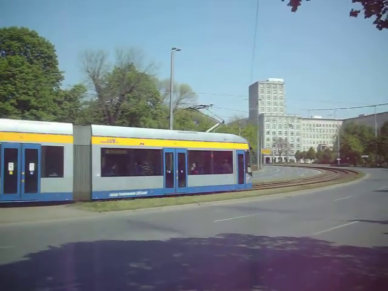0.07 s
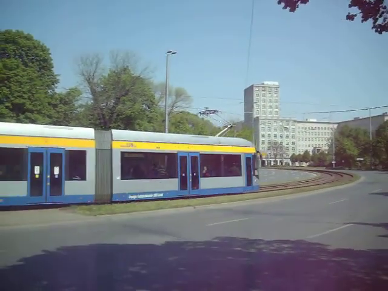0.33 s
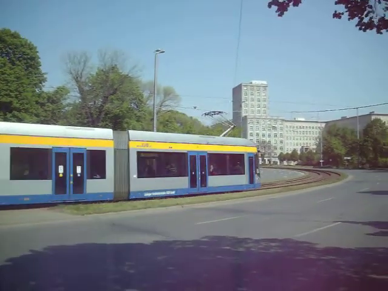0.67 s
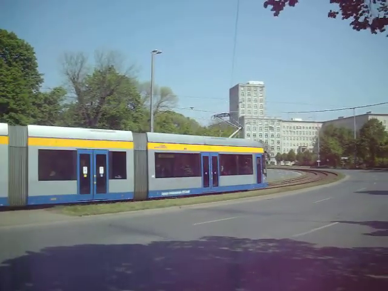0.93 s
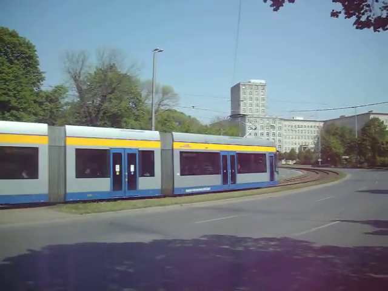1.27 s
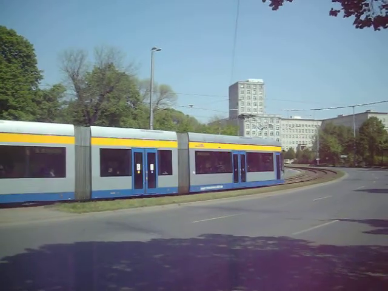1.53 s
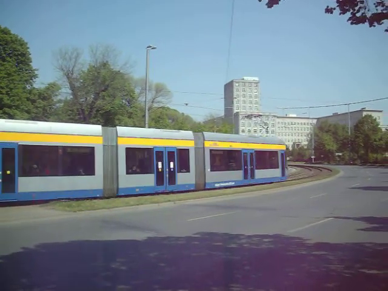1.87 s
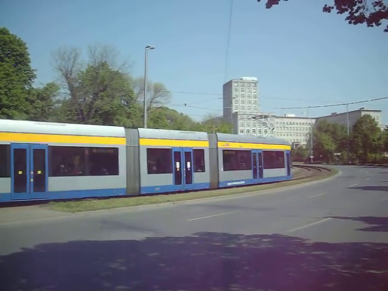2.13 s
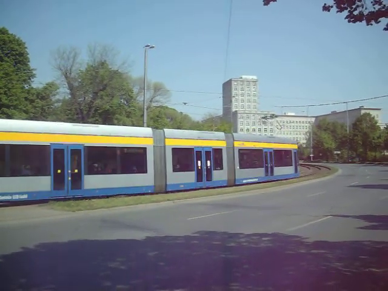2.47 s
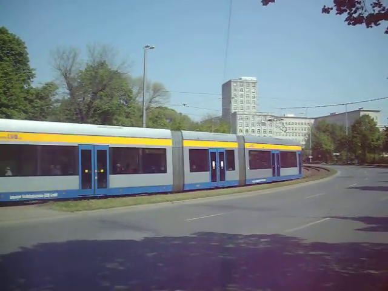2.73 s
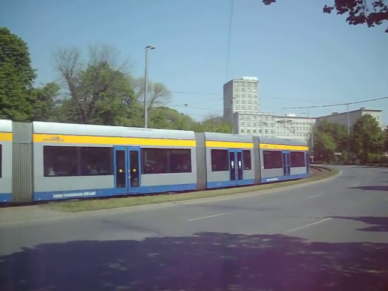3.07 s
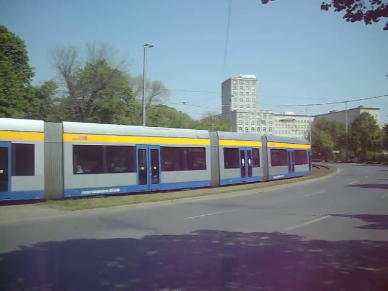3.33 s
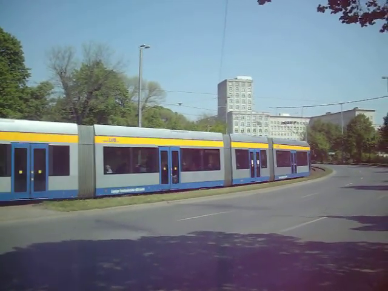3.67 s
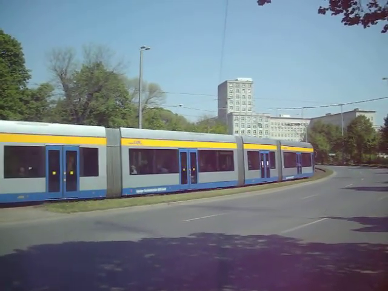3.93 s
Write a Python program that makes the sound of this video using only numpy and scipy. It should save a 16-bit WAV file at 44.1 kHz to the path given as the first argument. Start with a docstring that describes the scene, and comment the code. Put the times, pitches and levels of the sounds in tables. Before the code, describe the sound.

A tram rolls past on a curve beside a road, rumbling and thudding while its wheels clank over joints and briefly squeak. A faint drive whine, traffic hiss and distant bird chirps sit underneath, caught by a small microphone.

```python
"""A tram rolls past on a curve beside a road: its body rumbles and thuds over uneven track, the wheels
roar on the rails and the drive whines faintly. Wheels clank and ring over joints, and their flanges
grind and squeak as they stick and slip. A small bird chirps far off over the traffic hiss.
Clanks, squeaks and chirps echo in the street. The small camera's limiter ducks the rumble after the
loudest squeaks, and one thin, bright tick cuts through."""
import sys
import numpy as np
from scipy import signal
from scipy.fft import rfft, irfft
from scipy.io import wavfile
from scipy.ndimage import uniform_filter1d

SR = 44100
rng = np.random.default_rng(int(sys.argv[2]) if len(sys.argv) > 2 else 0)


def inscribe(sig):
    """Save sig as 16-bit PCM at rate SR to the path in sys.argv[1].

    A 1-D sig is mono; a 2-D sig holds one channel per row.
    Samples are clipped to [-1, 1] before scaling.
    """
    pcm = np.round(np.clip(np.atleast_2d(sig).T, -1, 1) * 32767)
    wavfile.write(sys.argv[1], SR, pcm.astype(np.int16))


N = 176400  # 4 seconds


def amp(db):
    """Decibels to gain."""
    return 10 ** (np.asarray(db) / 20)


def unit(x):
    """Scales to rms 1."""
    return x / np.sqrt(np.mean(x ** 2) + 1e-20)


def add(mix, start_s, sound):
    """Lays a sound into the mix, trimmed at the end."""
    part = mix[max(round(start_s * SR), 0):][:len(sound)]
    part += sound[:len(part)]


def seconds(length):
    """Time axis of that length."""
    return np.arange(int(length * SR)) / SR


def fader(points):
    """Gain over time from (seconds, dB) points."""
    return amp(np.interp(np.arange(N) / SR, *np.transpose(points)))


def wander(rate_hz):
    """Smooth random motion, rms 1."""
    hz = np.fft.rfftfreq(N, 1 / SR)
    return unit(irfft(rfft(rng.standard_normal(N)) * np.exp(-(hz / rate_hz) ** 2), N))


def noise(spectrum, patch_db=0):
    """Noise coloured by (Hz, dB) points, with brief random patches in time and pitch, rms 1."""
    grid = signal.stft(rng.standard_normal(N), nperseg=512, noverlap=384)[2]
    patches = uniform_filter1d(rng.standard_normal(grid.shape), size=12, axis=0)
    patches = unit(uniform_filter1d(patches, size=14, axis=1))
    mottled = signal.istft(grid * amp(patch_db * patches), nperseg=512, noverlap=384)[1][:N]
    hz, db = np.transpose(spectrum)
    colour = amp(np.interp(np.log(np.fft.rfftfreq(N, 1 / SR) + 1), np.log(hz), db))
    return unit(irfft(rfft(mottled) * colour, N))


def burst(t, length, attack_s, fade_s):
    """Attack, hold, exponential release."""
    return np.minimum(t / attack_s, 1) * np.exp(-np.maximum(t - length, 0) / fade_s)


def low_pass(x, hz):
    """Steep cut above hz."""
    return signal.oaconvolve(x, signal.firwin(255, hz, window=("kaiser", 8), fs=SR), "same")


def rolling_bed():
    """The body rumbles, the wheels roar on the rails, and rails and traffic hiss."""
    # The colour of each layer. Each row: frequency in Hz, relative level in dB.
    rumble_colour = [(8, -24), (25, -12.5), (53, -4), (67, -3.5), (90, 0.5), (117, -5), (140, -1),
                     (168, -1.5), (205, -5.5), (300, -10), (400, -11), (480, -29), (900, -57)]
    roar_colour = [(100, -12.5), (270, 2.5), (420, 0), (560, 2), (690, 0.5), (830, 1.5), (950, 1.5),
                   (1100, -3.5), (1250, -9.5), (1450, -15.5), (1800, -23), (2050, -16), (2230, -12.5),
                   (2400, -19.5), (2650, -26), (3500, -32), (6000, -55)]
    hiss_colour = [(300, -7.5), (2400, -0.5), (2850, 2.5), (3350, -1), (3600, -2.5), (4300, -6), (4950, 0),
                   (5300, -8.5), (5800, -22), (8000, -17)]
    # The fader ride of each layer. Each row: time in seconds, level in dB.
    rumble_ride = [(0, -12.5), (.7, -13), (.92, -11.5), (1.15, -12), (1.35, -13.5), (1.85, -11.5),
                   (2.2, -12.5), (2.4, -13.5), (3.0, -12), (3.13, -15), (3.3, -11.5), (4, -13)]
    roar_ride = [(0, -16.5), (.15, -21.5), (.5, -18.5), (.8, -19.5), (1.1, -17.5), (1.3, -18), (1.75, -17),
                 (2.0, -18.5), (2.2, -18.5), (2.45, -17), (2.8, -21), (3.05, -18.5), (3.3, -19.5),
                 (3.45, -17), (3.7, -13.5), (4, -17)]
    hiss_ride = [(0, -40), (.2, -45.5), (.6, -39.5), (.8, -38.5), (1.7, -40.5), (2.2, -37.5), (2.5, -41.5),
                 (3.05, -39.5), (3.4, -38.5), (3.8, -34.5), (4, -35.5)]
    rumble = noise(rumble_colour, patch_db=0.47) * fader(rumble_ride)
    roar = noise(roar_colour, patch_db=1.8) * fader(roar_ride)
    hiss = noise(hiss_colour, patch_db=1.5) * fader(hiss_ride)
    return rumble + roar + hiss


def bogie_thuds():
    """Uneven track sets the body booming for a few cycles."""
    # Jolts of the bogies. Each row: start in seconds, pitch in Hz, level in dB.
    jolts = [(0, 288.6, -11.5), (.14, 86.6, -16.5), (.48, 70, -14), (0.739, 92.8, -6), (0.886, 84.3, -6),
             (1.294, 160.4, -3), (1.489, 147.5, -10), (1.731, 69.2, -12.5), (1.89, 170, -10),
             (2.281, 169.7, -6), (2.432, 139.4, -6.5), (2.541, 125.6, -5), (2.729, 158, -12.5),
             (2.86, 100, -4.5), (2.974, 88.7, -1), (3.32, 160.7, -10), (3.488, 96.3, -12.5),
             (3.951, 91, -9)]
    out, t = np.zeros(N), seconds(.5)
    rise_s = 0.025
    swell = (t / rise_s * np.exp(1 - t / rise_s)) ** 2
    for (start, hz, db), phase in zip(jolts, rng.random(len(jolts))):
        add(out, start, amp(db) * swell * np.sin(2 * np.pi * (hz * t + phase)))
    return out


def wheel_ring(t, tilt_db):
    """A struck wheel rings in its modes, tuned and balanced a little differently each time."""
    # The wheel's modes. Each row: pitch in Hz, relative level in dB, seconds to fall by 60 dB.
    wheel_modes = [(624, -5.5, 0.014), (974, -0.5, 0.048), (1121, 0, 0.056), (1219, -0.5, 0.046),
                   (1594, -12, 0.013), (1880, -12, 0.005), (2099, -6, 0.022), (2370, -6, 0.016),
                   (2753, -8, 0.012), (2942, -6, 0.037), (3160, -7, 0.03), (3287, -9.5, 0.033),
                   (3354, -5, 0.03), (5300, -24.5, 0.032)]
    hz, mode_db, t60 = np.transpose(wheel_modes)[:, :, None]
    pivot_hz, spread_db = 2310, 1.56
    detune, spread = rng.standard_normal((2, len(wheel_modes), 1))
    modes = amp(-60 * t / t60) * np.sin(2 * np.pi * hz * (1 + 0.0052 * detune) * t)
    weight = amp(mode_db + tilt_db * np.log2(hz / pivot_hz) + spread_db * spread)
    polarity = rng.choice([-1, 1], hz.shape)
    return (weight * polarity * modes / np.linalg.norm(modes, axis=1, keepdims=True)).sum(0)


def wheel_clanks():
    """At a joint, a blow and a short gritty scrape ring the wheel and spit some treble."""
    # Wheel hits. Each row: start in seconds, scrape length in seconds, relative level in dB,
    # treble trim in dB, tilt of the ring in dB per octave.
    hits = [(0.032, 0.011, -21.5, 8.5, 0), (0.049, 0.047, -38, 0.5, 0), (0.239, 0.013, -21, -6, -3),
            (0.255, 0.016, -16.5, -4.5, -5), (0.432, 0.013, -29, 5, 0), (0.527, 0.027, -26, -2, -7),
            (0.597, 0.023, -22.5, 0.5, -5.5), (0.636, 0.032, -27, 0.5, -6.5),
            (0.672, 0.0064, -24.5, 1, -1.5), (0.937, 0.011, -25, -1, -10), (0.969, 0.01, -18, -2, 10.5),
            (1.22, 0.06, -28.5, 10.5, -5), (1.389, .01, -14.5, 3, 3), (1.422, .008, -17.5, -11, -4),
            (1.584, 0.0083, -26, 5, -4), (1.745, 0.0099, -19, -2, 4), (1.757, .02, -25, -4, -2.5),
            (1.788, 0.0072, -16, -8, -5), (1.81, 0.0094, -26.5, -2, -2.5), (2.042, 0.0045, -22, 6, -7),
            (2.076, .007, -22.5, 16.5, -7.5), (2.094, 0.016, -13, -5.5, -2.5),
            (2.449, 0.052, -24.5, 7, 1.5), (2.495, 0.014, -18.5, 1, -3.5), (2.581, .03, -21, 6, -5),
            (2.698, .008, -28.5, -5.5, -7.5), (2.821, 0.0089, -37, -9.5, 7), (3.284, 0.029, -22, 1, 2),
            (3.323, .006, -24, 5, -6), (3.477, 0.021, -22.5, -5, -4), (3.503, 0.028, -21.5, -1, -4.5),
            (3.646, 0.015, -16, 0, -0.5), (3.717, 0.038, -27, -3, -8.5), (3.783, 0.014, -21, -6, 0),
            (3.807, 0.015, -18, -5, -1), (3.848, 0.023, -19, 3.5, -1)]
    # The sizzle of the contact. Each row: frequency in Hz, relative level in dB.
    treble_colour = [(1000, -28), (3000, -9), (3600, -3), (4200, -13), (5200, 1.5), (5800, -7), (9000, -4)]
    strike_db, ring_db, treble_db = 19, -6.5, -16
    out, t = np.zeros(N), seconds(.2)
    grit = unit(np.exp(0.47 * wander(rate_hz=310)))
    treble = noise(treble_colour)
    for start, length, db, trim_db, tilt_db in hits:
        here = (round(start * SR) + np.arange(len(t))) % N
        contact = burst(t, length, attack_s=0.0014, fade_s=.005) * grit[here]
        force = contact * rng.standard_normal(len(t))
        force[0] += amp(strike_db)  # the blow ahead of the scrape
        add(out, start, amp(db + ring_db) * signal.fftconvolve(force, wheel_ring(t, tilt_db)))
        add(out, start, amp(db + treble_db + trim_db) * contact * treble[here])
    return out


def street_echo(x):
    """A thin tail of scattered echoes from road, trees and the tram's side."""
    t, t60_s = seconds(.5), 0.31
    tail = rng.standard_normal(len(t)) * amp(-60 * t / t60_s) * np.minimum(t / .01, 1)
    return signal.oaconvolve(x, tail / np.linalg.norm(tail))[:N]


def drive_whines():
    """The drive and singing wheels give thin wavering tones that swell and fade, most creeping upward."""
    # Whines. Each row: start and length in seconds, first and last pitch in Hz, relative level in dB.
    glides = [(.05, .72, 935, 950, -23), (.7, 1.35, 955, 1045, -29), (.45, .55, 400, 412, -25),
              (2.2, 1.0, 878, 897, -25), (2.95, 1.4, 890, 920, -25.5), (.45, .6, 2020, 2070, -40),
              (3.55, .5, 2090, 2150, -39), (.95, .6, 1510, 1560, -38), (1.45, .6, 1535, 1560, -42),
              (.55, .5, 2160, 2195, -41), (1.0, .45, 2200, 2255, -35), (1.4, 1.25, 2230, 2245, -43),
              (2.73, .24, 2230, 2240, -31), (2.85, .6, 2242, 2240, -38)]
    out = np.zeros(N)
    shake = wander(rate_hz=16)
    for start, length, from_hz, to_hz, db in glides:
        t = seconds(length)
        waver = 1 + .0015 * wander(rate_hz=30)[:len(t)]
        hz = np.interp(t, [0, length], [from_hz, to_hz]) * waver
        tremble = 1 + .25 * np.roll(shake, -round(start * SR))[:len(t)]
        swell = np.sin(np.pi * t / length) * tremble
        add(out, start, amp(db + 1.5) * swell * np.sin(2 * np.pi * np.cumsum(hz) / SR))
    return out


def flange_squeaks():
    """The flange sticks and slips on the rail in short, unsteady tones, once with a bright snap."""
    # Squeaks. Each row: start and length in seconds, level in dB, first and last pitch in Hz,
    # second and third harmonic in dB against the fundamental.
    slips = [(.25, 0.036, -17.5, 1200, 1205, -12, -24), (0.962, 0.011, -0.5, 1041, 1081, -26, -26),
             (0.969, 0.012, -6, 1155, 1150, -3.5, -14.5), (0.988, .026, -4, 1158, 1178, -18, -26.5),
             (1.955, 0.045, -17.5, 1130, 1102, -29, -26), (2.028, 0.022, -1, 1072, 1020, -28, -31),
             (2.066, 0.012, -9, 1105, 1052, -18.5, -24), (2.092, 0.017, -5.5, 1073, 1065, -8.5, -7.5),
             (2.111, .022, -15.5, 1078, 1115, -6.5, -5), (2.589, 0.017, -11.5, 1252, 1153, -13, -27.5),
             (2.607, 0.017, -21, 1077, 1090, -1, -2), (2.622, 0.032, -13.5, 1186, 1090, -15.5, -23)]
    # The snap as the flange slips free. Each row: frequency in Hz, relative level in dB.
    snap_colour = [(3000, -44), (4500, -13), (4900, -23), (5350, 5.5), (5550, -3), (5700, -2.5),
                   (6200, -21), (7500, -7.5), (12000, -5)]
    snap_at_s, snap_db = 2.092, -2.5
    out, t = np.zeros(N), seconds(.1)
    jitter, shake = wander(rate_hz=390), wander(rate_hz=270)
    for start, length, db, from_hz, to_hz, second_db, third_db in slips:
        here = round(start * SR) + np.arange(len(t))
        hz = np.interp(t, [0, length], [from_hz, to_hz]) * (1 + 0.018 * jitter[here])
        phase = 2 * np.pi * np.cumsum(hz) / SR
        harmonics_db = [0, second_db, third_db, third_db - 19, third_db - 19]
        tone = sum(amp(h) * np.sin(k * phase) for k, h in enumerate(harmonics_db, 1))
        envelope = burst(t, length, attack_s=0.0033, fade_s=.003) * np.exp(0.13 * shake[here])
        add(out, start, amp(db) * tone * envelope)
    snap = noise(snap_colour)[:len(t)] * burst(t, 0.0032, attack_s=.002, fade_s=0.0041)
    add(out, snap_at_s, amp(snap_db) * snap)
    return out


def distant_bird():
    """Each chirp is one small, unsteady arch of pitch, half lost in its echoes."""
    # Chirps. Each row: start and length in seconds, top of the arch in Hz, relative level in dB.
    chirps = [(0.326, 0.03, 4530, -38), (0.355, 0.037, 4100, -33), (0.388, 0.029, 3630, -36),
              (.912, 0.018, 4240, -32.5), (2.006, 0.033, 3980, -33), (2.781, .03, 4000, -36),
              (3.16, 0.032, 4050, -38)]
    bend, jitter = .17, 0.029  # fractions of the top pitch
    out = np.zeros(N)
    for start, length, top_hz, db in chirps:
        arch = np.sin(np.pi * seconds(length) / length)
        hz = top_hz * (1 - bend * (1 - arch) + jitter * wander(rate_hz=330)[:len(arch)])
        add(out, start, amp(db) * np.sqrt(arch) * np.sin(2 * np.pi * np.cumsum(hz) / SR))
    return .7 * out + .5 * street_echo(out)


def scene():
    """The tram, the bird and the echoes of the street, in mono."""
    clanks, squeaks = wheel_clanks(), flange_squeaks()
    echo = amp(-9.5) * street_echo(clanks + 0.67 * squeaks)
    tram = rolling_bed() + bogie_thuds() + drive_whines() + clanks + squeaks
    return (tram + distant_bird() + echo)[None]


def limiter(x):
    """Ducks fast on peaks over the threshold and recovers slowly."""
    threshold_db, recovery_db_per_s = -3.5, 38.5
    peak_db = 20 * np.log10(abs(x) + 1e-9)
    fall_db = np.arange(N) / SR * recovery_db_per_s
    held_db = np.maximum.accumulate(peak_db + fall_db) - fall_db
    over_db = np.maximum(held_db - threshold_db, 0)
    return x / amp(uniform_filter1d(over_db, size=60))


def record(dry):
    """The camera's limiter and narrow band, a hard ceiling, then one thin, bright tick."""
    ceiling, tick_at_s = 0.744, 1.4235
    narrow = low_pass(limiter(dry[0]), hz=5840)
    out = np.clip(narrow, -ceiling, ceiling)
    add(out, tick_at_s, amp([-12]))  # a one-sample spike
    return low_pass(out, hz=15850)[None]


dry = scene()
out = record(dry)
inscribe(out)
```